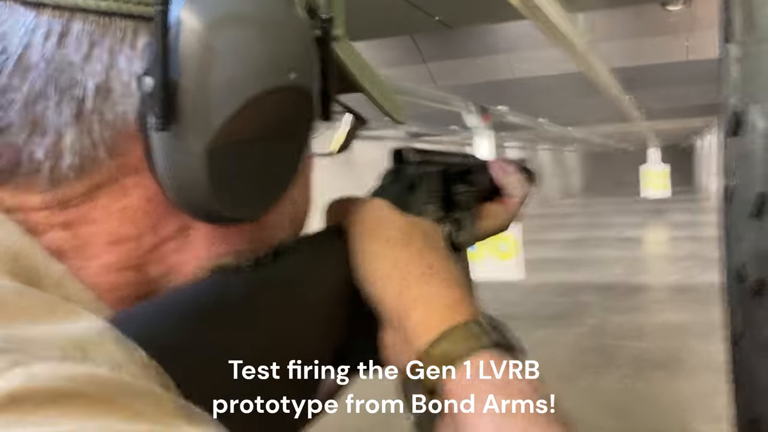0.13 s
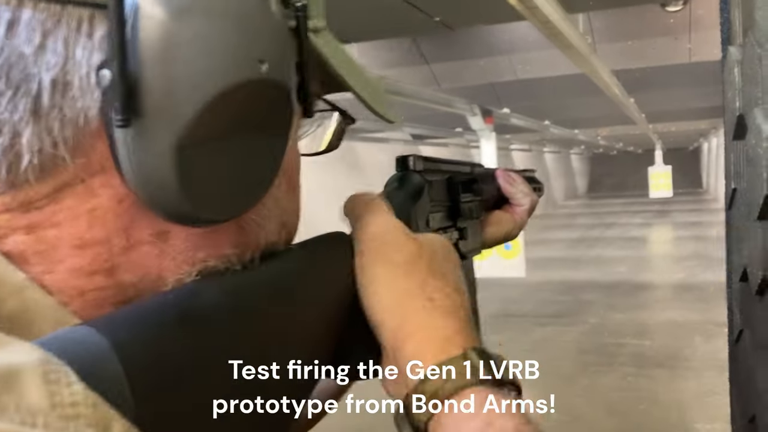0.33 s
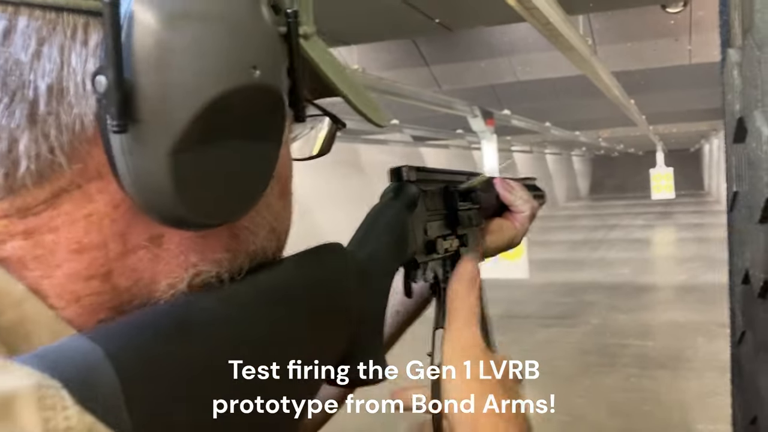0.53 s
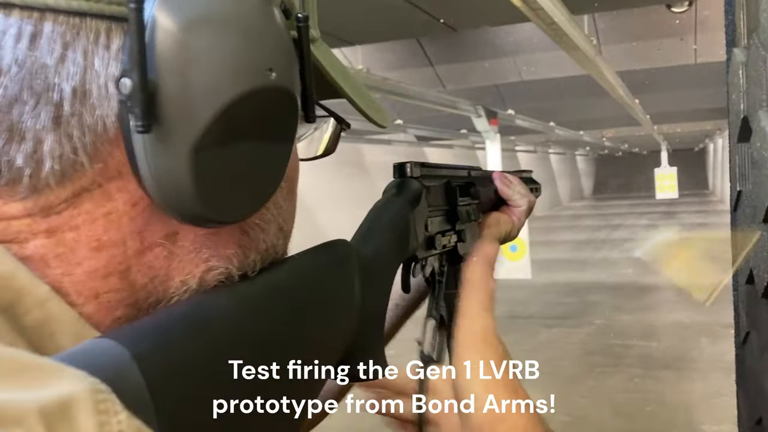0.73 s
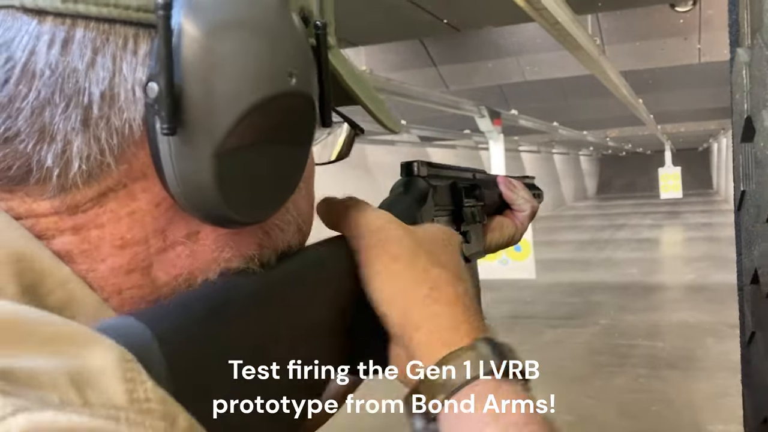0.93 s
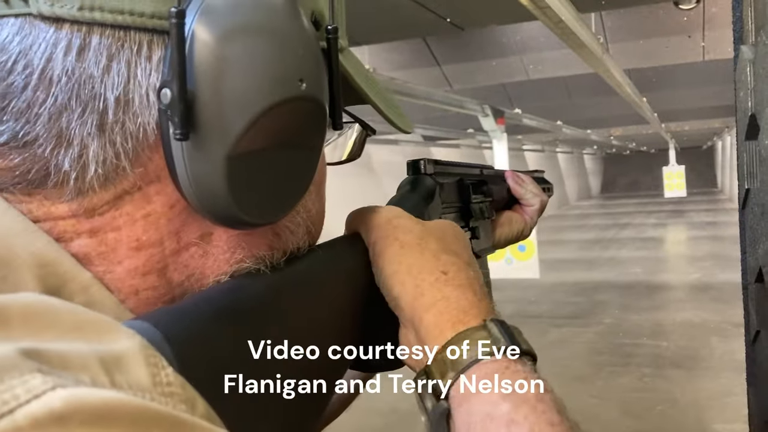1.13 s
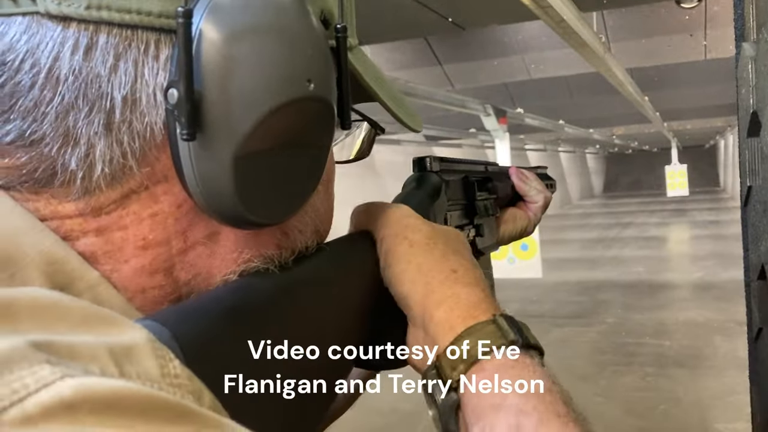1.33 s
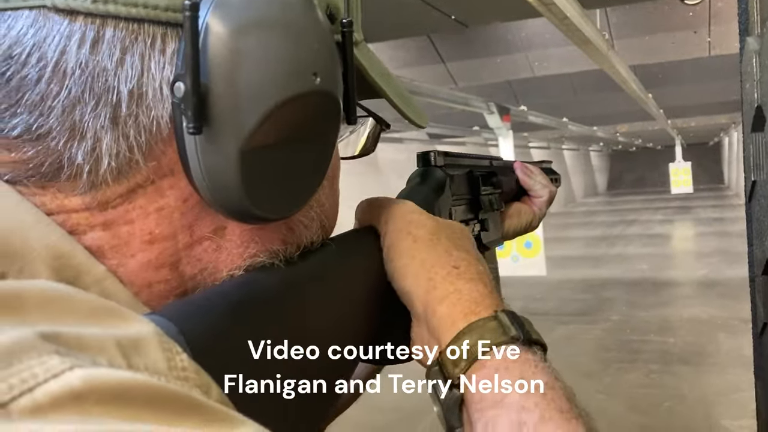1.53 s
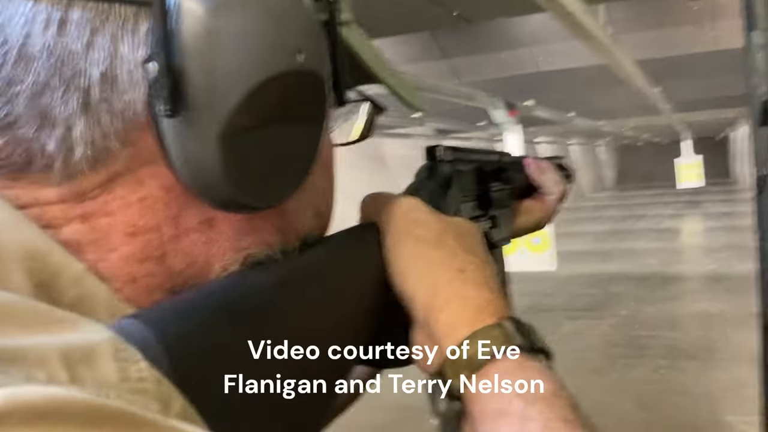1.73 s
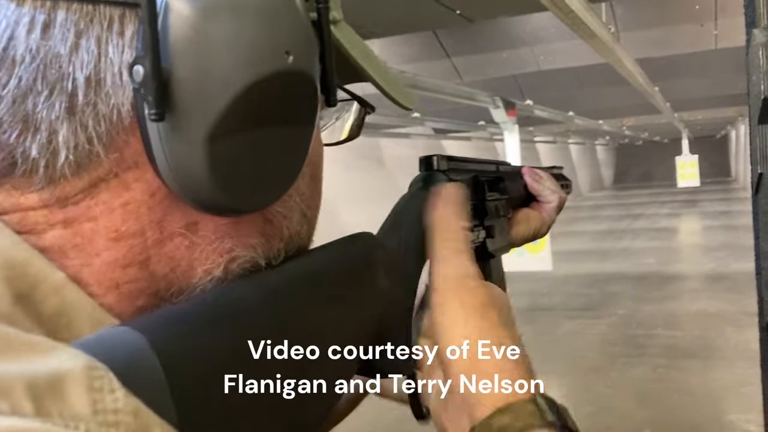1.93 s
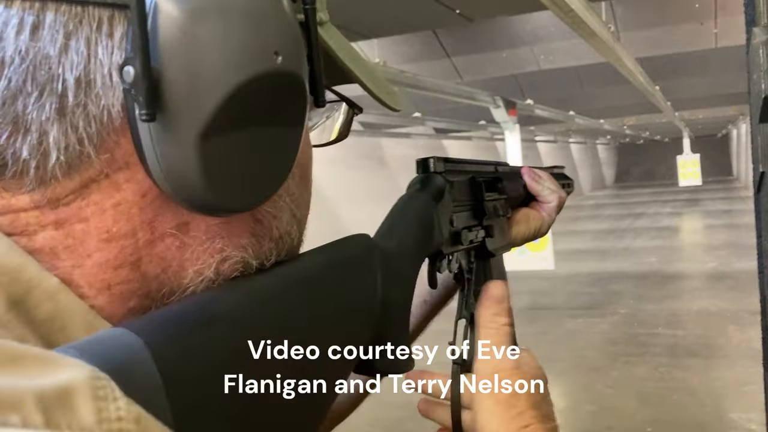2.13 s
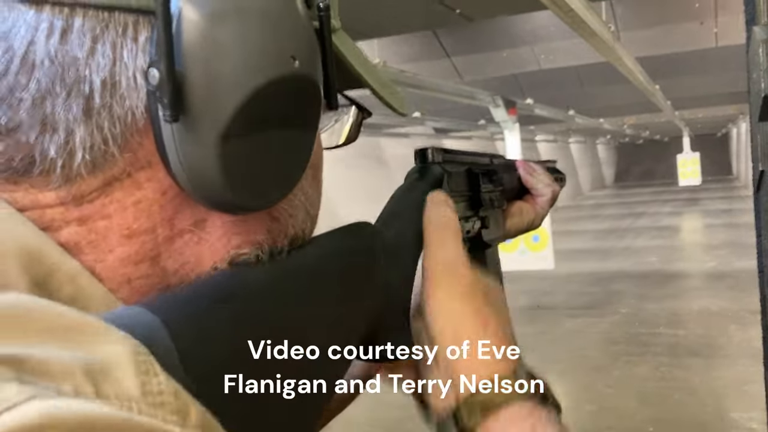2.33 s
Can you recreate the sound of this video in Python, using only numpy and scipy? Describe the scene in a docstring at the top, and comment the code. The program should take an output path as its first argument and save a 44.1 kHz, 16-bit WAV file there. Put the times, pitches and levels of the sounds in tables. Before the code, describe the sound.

Two loud, echoing rifle shots at an indoor range, each followed by metallic lever clacks.

```python
"""In a concrete indoor shooting range, a lever-action rifle is fired twice, close to the microphone.
Each shot is a crack that overloads the microphone, a boom in the firing booth, a long echo in the
hall and a dull swell coming back from the far end. After each shot the lever is thrown open and
shut: steel parts clack and a small spring pings. Ventilation hums underneath."""
import sys
import numpy as np
from scipy import signal
from scipy.fft import rfft, irfft
from scipy.io import wavfile
from scipy.ndimage import uniform_filter1d

SR = 44100
rng = np.random.default_rng(int(sys.argv[2]) if len(sys.argv) > 2 else 0)


def wav_record(signal):
    """Record a signal, one row per channel, as 16-bit PCM in the file named by sys.argv[1]."""
    frames = np.transpose(np.atleast_2d(signal))
    bounded = np.clip(frames, -1, 1)
    # unit amplitude maps onto the largest positive 16-bit level
    quanta = np.round(bounded * 32767).astype(np.int16)
    wavfile.write(sys.argv[1], SR, quanta)


N = 110250
T = np.arange(N) / SR
HZ = np.maximum(np.fft.rfftfreq(N, 1 / SR), 1)

# The two shots: t/s, crack and thump gain/dB, boom gain/dB, echo gain/dB, swell gain/dB, swell delay/s
SHOTS = [(0.1461, 2, 0.5, 0, -2, .52), (1.6275, 0, -3, -2, -1, .51)]
# A "tone" says how strong a noise is from low to high pitch. The sharp crack: f/Hz, level/dB
CRACK_TONE = [(200, -68.5), (800, -55), (1400, -51), (2000, -50.5), (3000, -56.5), (4300, -54.5),
              (6000, -62), (9000, -56.5), (12000, -59), (15500, -65.5)]
# The blast's low push, just under the crack: f/Hz, level/dB
THUMP_TONE = [(30, -70), (60, -49), (130, -50), (280, -42.5), (450, -33), (580, -33.5), (780, -39.5),
              (950, -45.5), (1400, -56.5), (4000, -84.5)]
# The boom in the firing booth: f/Hz, level/dB
BOOM_TONE = [(25, -68.5), (42, -57), (60, -40), (170, -47.5), (270, -40.5), (470, -38), (680, -46.5),
             (900, -62), (1300, -60), (2200, -69.5), (5000, -86.5), (15000, -86)]
# Pitches at which the booth and hall ring: f/Hz, width/Hz, boost/dB
ROOM_RINGS = [(61.5, 10, 2.5), (126, 27, 3), (259.5, 34, 6), (333, 20, 6.5), (407.2, 9.8, 2.5),
              (478.7, 16, 7.5), (544.8, 29, 3.5), (674, 10, 4.5), (846, 10, 1.5), (998, 69, 6.5),
              (1932, 45, 7.5), (2540, 40, 3), (2620, 17, 3.5), (3540, 40, 4)]

def rifle_shots():
    """The blast cracks and thumps at the muzzle, booms off the near walls, then fills the hall."""
    out = 0
    for start_s, crack_db, boom_db, echo_db, swell_db, swell_delay_s in SHOTS:
        crack = noise(at_hz(CRACK_TONE, HZ))
        crack *= envelope(attack_s=0.0056, hold_s=0.013, fall_db_per_s=477.5)
        thump = noise(at_hz(THUMP_TONE, HZ))
        thump *= envelope(attack_s=0.0087, hold_s=0.028, fall_db_per_s=902.5)
        boom = noise(at_hz(BOOM_TONE, HZ) + boosts(ROOM_RINGS))
        boom *= envelope(attack_s=0.016, hold_s=0.047, fall_db_per_s=137)
        near = from_db(crack_db) * (crack + thump) + from_db(boom_db) * delayed(boom, seconds=0.036)
        hall = from_db(echo_db) * hall_echo() + from_db(swell_db) * far_swell(swell_delay_s)
        out += delayed(near + hall, start_s)
    return out


# The hall's long echo: f/Hz, level/dB
ECHO_TONE = [(20, -71.5), (40, -67.5), (58, -46), (130, -48.5), (270, -45.5), (540, -37.5), (680, -43.5),
             (900, -57), (1350, -67), (3200, -63), (6000, -67), (10500, -73), (15500, -91.5)]
# How long the echo takes to fade by 60 dB: f/Hz, fade time/s
ECHO_FADE = [(45, 1.1), (130, 3.26), (270, 1.94), (550, 1.81), (1300, 1.295), (3200, 1.516), (6000, 1.05),
             (10000, 0.81), (15000, 1.3)]

def hall_echo():
    """Many reflections blur together. Each pitch fades at its own rate, and the lows build up slowly."""
    spectrum = rfft(noise(at_hz(ECHO_TONE, HZ) + boosts(ROOM_RINGS)))
    band_hz = 2 ** (np.round(2 * np.log2(np.maximum(HZ, 40))) / 2)  # nearest half octave
    out = 0
    for hz in np.unique(band_hz):
        band = irfft(spectrum * (band_hz == hz), N)
        attack_s = 0.012 + 11 / hz  # 12 ms plus 11 cycles of this pitch
        out += band * envelope(attack_s, hold_s=0, fall_db_per_s=60 / at_hz(ECHO_FADE, hz))
    return out


# The swell from the far end: f/Hz, level/dB
SWELL_TONE = [(25, -77.5), (42, -66.5), (60, -57.5), (130, -50.5), (270, -50), (520, -51), (680, -57.5),
              (1000, -75), (2200, -82), (5000, -105), (15000, -130)]

def far_swell(delay_s):
    """The blast comes back from the far end, dull and smeared, and is loudest after delay_s."""
    rise_s, fall_db_per_s = 0.13, 44.5
    rise = np.exp(-0.5 * (np.minimum(T - delay_s, 0) / rise_s) ** 2)
    fall = from_db(-fall_db_per_s * np.maximum(T - delay_s, 0))
    return noise(at_hz(SWELL_TONE, HZ) + boosts(ROOM_RINGS)) * rise * fall


STRIKE_ATTACK_S, STRIKE_HOLD_S = 0.00034, 0.00067
# Steel parts hitting each other: t/s, clack gain/dB, fall/(dB/s), treble tilt/(dB/octave), ping gain/dB
LEVER_HITS = [(.005, -61, 706, 2.5, -74), (.029, -59.5, 700, 5.5, -52.5), (.526, -54, 500, 3, -74),
              (.537, -52, 597, 4.5, -62), (0.555, -25.5, 1106, 2.5, -61), (0.7038, -51, 1100, -9, -52),
              (.769, -50.5, 500, -1, -74), (.789, -57, 500, -6, -74), (0.8585, -35, 1200, 1.5, -62),
              (.866, -40.5, 1098, 1.5, -70), (0.8847, -40.5, 602, 2, -69), (.892, -42, 701, 1.5, -68),
              (0.899, -67, 800, 1, -73), (1.3855, -55.5, 451, 14, -49), (2.0441, -38, 1007, -4, -56),
              (2.0595, -24.5, 1004, 4, -57), (2.1933, -50.5, 1496.5, -12, -57),
              (2.268, -60, 600, -3.5, -75), (2.2765, -49, 503, -1.5, -78), (2.336, -38.5, 800.5, 2.5, -72),
              (2.353, -36.5, 2500, 4, -75), (2.3714, -37, 703.5, 3, -76), (2.378, -49.5, 700, -2.5, -67.5),
              (2.393, -56, 717, -12, -76), (2.4299, -72, 701, 2, -55)]
# The clack of the rifle's steel body: f/Hz, level/dB
BODY_TONE = [(200, -58), (1100, -38.5), (2500, -40), (6300, -48.5), (8200, -44.5), (11000, -45),
             (13500, -55), (16000, -49)]
# Pitches at which that body rings: f/Hz, width/Hz, boost/dB
BODY_RINGS = [(1820, 63, 2.5), (3700, 160, 10), (4200, 130, 8), (4580, 270, 7.6), (5080, 180, 4.3),
              (6170, 58, 3.7), (7100, 78, 5.2), (7400, 130, 6), (8050, 280, 7), (9900, 190, 9.5),
              (10900, 90, 4.5)]
# The small spring's notes: f/Hz, level/dB, time to fade by 60 dB/s
SPRING_NOTES = [(15040, -3, .16), (15150, -0.5, .23), (15290, 0.5, 0.17), (15350, -9.5, .2),
                (15560, -8, .2), (10890, -19, .38), (10960, -24.5, .25), (12230, -24, .17)]

def lever():
    """Each hit rattles the rifle's body, echoes faintly in the booth and sets the spring ringing."""
    body_db = at_hz(BODY_TONE, HZ) + boosts(BODY_RINGS)
    octaves = np.log2(np.maximum(HZ, 3000) / 8000)  # the treble tilts around 8 kHz
    booth_echo = from_db(-38) * envelope(STRIKE_ATTACK_S, STRIKE_HOLD_S, fall_db_per_s=162.5)
    out = 0
    for start_s, clack_db, fall_db_per_s, tilt_db, ping_db in LEVER_HITS:
        strike = envelope(STRIKE_ATTACK_S, STRIKE_HOLD_S, fall_db_per_s)
        clack = noise(body_db + tilt_db * octaves) * (strike + booth_echo)
        ping = ringing_steel(SPRING_NOTES, scatter_db=2.5)
        out += delayed(from_db(clack_db) * clack + from_db(ping_db) * ping, start_s)
    return out


# The notes in the tick: f/Hz, level/dB, time to fade by 60 dB/s
TICK_NOTES = [(14900, 2, 0.015), (15300, -7, .01), (14700, -7, .008), (14100, -12, .004),
              (12330, -14, 0.0034)]

def high_tick():
    """The rifle's moving parts give one sharp, very high tick before the second shot."""
    return from_db(-12) * delayed(ringing_steel(TICK_NOTES), seconds=1.3858)


def ringing_steel(notes, scatter_db=0):
    """Struck steel rings with pure, fading notes; scatter_db varies their strength from hit to hit."""
    t = T[:N // 5]
    out = np.zeros((2, N))
    for hz, db, fade_s in notes:
        level_db = db + scatter_db * rng.standard_normal() - 60 * t / fade_s
        out[:, :len(t)] += from_db(level_db) * np.sin(2 * np.pi * (hz * t + rng.random()))
    return out * np.minimum(T / STRIKE_ATTACK_S, 1)


# The hum of the ventilation: f/Hz, level/dB
VENT_TONE = [(25, -93.5), (60, -81), (130, -75), (200, -77), (270, -77.5), (520, -77.5), (720, -88),
             (1200, -103), (3200, -108), (4500, -125), (15000, -135)]

def ventilation():
    """The ventilation makes a soft, low, steady noise."""
    return noise(at_hz(VENT_TONE, HZ))


# How alike the room sounds on the left and right: f/Hz, likeness (0 to 1)
STEREO_LIKENESS = [(60, .68), (130, .78), (280, .9), (650, .91), (1000, .3), (1600, .05)]

def noise(db_per_hz):
    """Stereo noise with the given tone, much the same on both sides in the bass."""
    mid, side = rfft(rng.standard_normal((2, N)))
    alike = at_hz(STEREO_LIKENESS, HZ)
    pair = np.sqrt(1 + alike) * mid + np.sqrt(1 - alike) * side * np.array([[1], [-1]])
    return irfft(pair * from_db(db_per_hz) * np.sqrt(SR) / 2, N)


def envelope(attack_s, hold_s, fall_db_per_s):
    """Loudness over time: rise smoothly, hold, then fade away."""
    rise = np.sin(np.pi / 2 * np.minimum(T / attack_s, 1)) ** 2
    drop_db = np.clip((T - attack_s - hold_s) * fall_db_per_s, 0, 200)
    return rise * from_db(-drop_db)


def boosts(rings):
    """The decibels that ringing adds around each of its pitches."""
    return sum(db / (1 + (2 * (HZ - hz) / width) ** 2) for hz, width, db in rings)


def at_hz(points, hz):
    """Read between the rows of a table, with every octave equally wide."""
    row_hz, values = np.transpose(points)
    return np.interp(np.log(hz), np.log(row_hz), values)


def delayed(x, seconds):
    """The same sound, starting later."""
    return np.pad(x, ((0, 0), (int(seconds * SR), 0)))[:, :N]


def from_db(db):
    """Turn decibels into a number to multiply by."""
    return 10 ** (np.asarray(db) / 20)


def scene():
    """Everything heard in the range, added together."""
    return high_tick() + rifle_shots() + lever() + ventilation()


def microphone(x):
    """The left side hears slightly late, and its treble is the right side's wave upside down."""
    left_lag_s, treble_hz = 0.000217, 6000
    left, right = rfft(np.hstack([x, x[:, ::-1]]))  # mirrored, so that the ends join smoothly
    hz = np.maximum(np.fft.rfftfreq(2 * N, 1 / SR), 1)
    shared = 1 / (1 + (treble_hz / hz) ** 20)
    left = np.sqrt(1 - shared) * left - np.sqrt(shared) * right
    left *= np.exp(-2j * np.pi * hz * left_lag_s)
    return irfft(np.array([left, right]), 2 * N)[:, :N]


def limiter(x, limit_db, recovery_db_per_s):
    """Turn the volume down at each peak over the limit, then let it come back."""
    peak_db = 20 * np.log10(np.abs(x).max(axis=0) + 1e-9)
    over_db = np.maximum(peak_db - limit_db, 0)
    recovery_db = recovery_db_per_s * T
    cut_db = np.maximum.accumulate(over_db + recovery_db) - recovery_db
    return x * from_db(-uniform_filter1d(cut_db, size=44))  # smoothed over 1 ms


def record(dry):
    """The shots overload the microphone: peaks are turned down and clipped, and the top treble is cut."""
    limited = limiter(microphone(dry), limit_db=-2.2, recovery_db_per_s=303)
    clipped = np.clip(limited, -0.78, 0.78)
    treble_cut = signal.butter(16, 15900, fs=SR, output="sos")
    return signal.sosfiltfilt(treble_cut, clipped)


dry = scene()
out = record(dry)
wav_record(out)
```